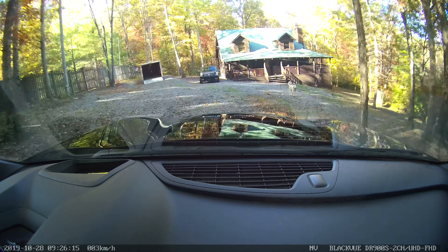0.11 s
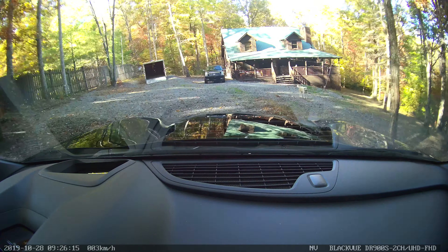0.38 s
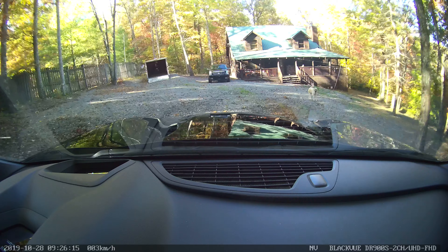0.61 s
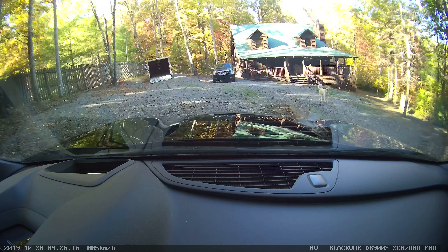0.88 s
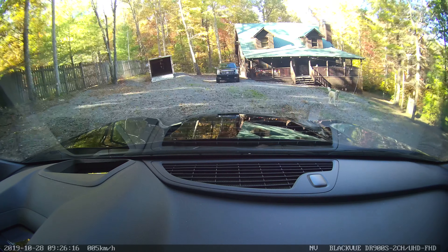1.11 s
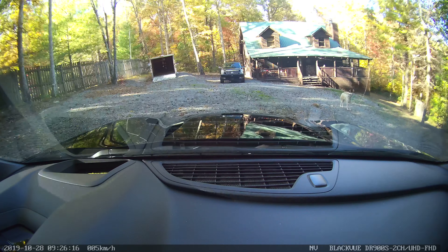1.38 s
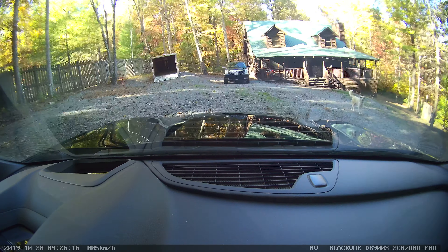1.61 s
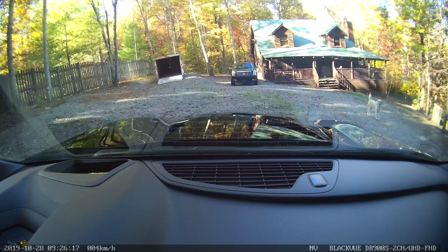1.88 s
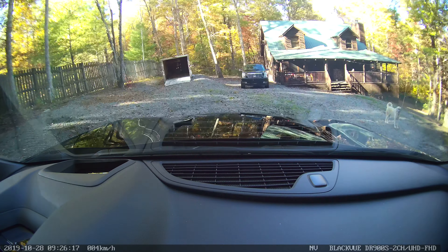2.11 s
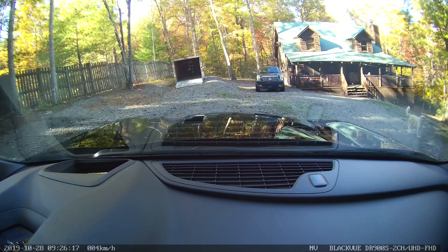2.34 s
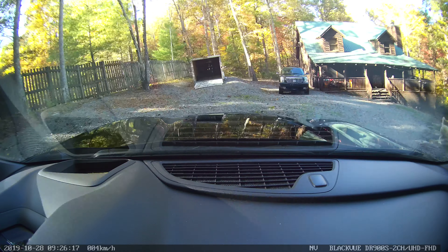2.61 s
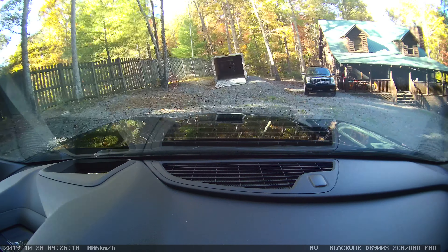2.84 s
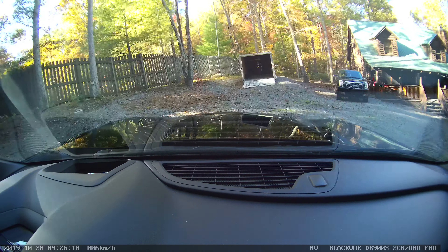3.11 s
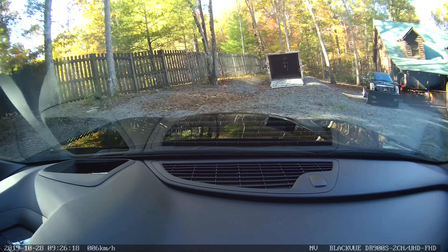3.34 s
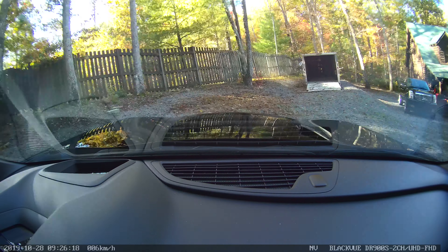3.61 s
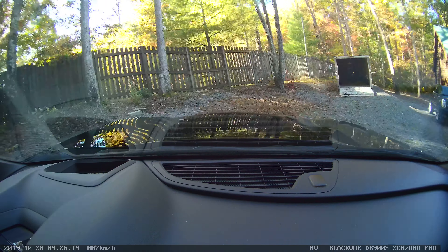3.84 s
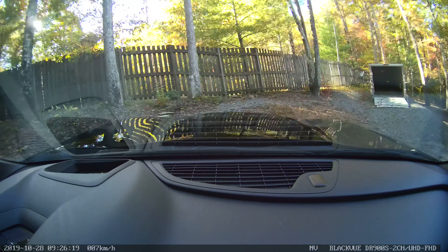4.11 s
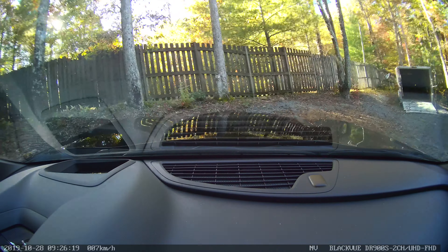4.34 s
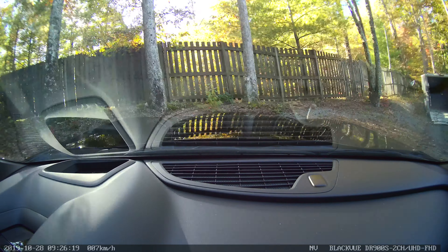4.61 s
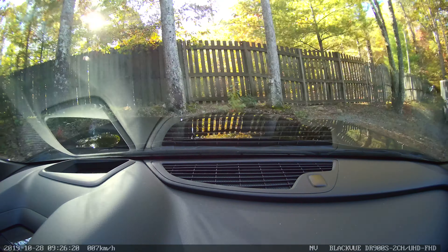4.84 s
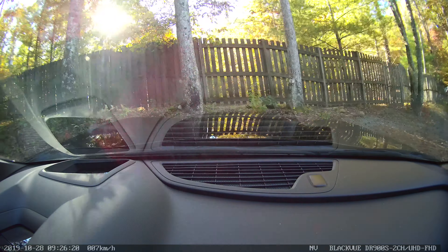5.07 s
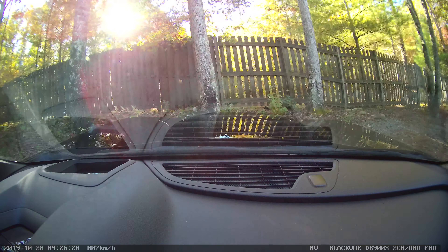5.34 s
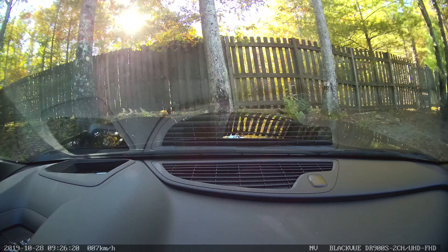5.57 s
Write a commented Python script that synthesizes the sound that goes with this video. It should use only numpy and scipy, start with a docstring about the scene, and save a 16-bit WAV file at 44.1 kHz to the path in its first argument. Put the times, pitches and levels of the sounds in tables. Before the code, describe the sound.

Tyres roll slowly over loose gravel, heard inside the closed cabin. Low body boom swells with each bump over a wavering engine idle. Small muted ticks come first, then the loudest thuds and hard stone hits around 2.8 to 3.7 seconds. Afterwards the crunch thins to soft, low thumps as the shaking fades. The dashboard microphone is close, dull and slightly hissy.

```python
"""The body of a car booms and rumbles as it crawls over gravel and slows down: random jolts of the
wheels shake resonances of cabin, shell and floor. Crushed gravel crunches dully through the floor, larger
stones thud as noise bursts in the same resonances, and thrown stones ring the decaying modes of the metal.
The idling engine hums as wavering sines. A small microphone behind the windscreen adds coloured hiss."""
import sys
import numpy as np
from scipy import signal
from scipy.fft import rfft, irfft, next_fast_len
from scipy.io import wavfile
from scipy.ndimage import uniform_filter1d

SR = 44100
rng = np.random.default_rng(int(sys.argv[2]) if len(sys.argv) > 2 else 0)


def inscribe(sig):
    """Save sig as 16-bit PCM at rate SR to the path in sys.argv[1].

    A 1-D sig is mono; a 2-D sig holds one channel per row.
    Samples are clipped to [-1, 1] before scaling.
    """
    pcm = np.round(np.clip(np.atleast_2d(sig).T, -1, 1) * 32767)
    wavfile.write(sys.argv[1], SR, pcm.astype(np.int16))


def ratio_of_db(decibels):
    """Turn decibels (scalar or array-like) into linear amplitude factors; 0 dB maps to 1."""
    return 10 ** (np.asarray(decibels, float) / 20)


N = 251801

# resonances of the body shell (first two) and floor pan: hz, nominal width_hz, relative level_db per Hz
SHELL_MODES = [(83.1, 30.2, 0), (114.7, 31.3, -0.5), (150.3, 55.8, -6), (209, 59.6, -7.5),
               (298.4, 58, -16.5)]
# resonances of the cabin that colour the crunch: hz, nominal width_hz, relative level_db per Hz
CABIN_MODES = [(368.5, 125, 3), (549.6, 108, 0.5), (758, 209, -1), (1070, 167, -10), (1305, 205, -9),
               (1485, 270, -27.5), (2020, 400, -24), (3020, 520, -32), (5370, 2700, -34.5)]


def rms_one(x):
    """Normalisation: the signal scaled to rms 1."""
    return x / np.sqrt(np.mean(x ** 2) + 1e-20)


def drift(rate_hz):
    """Slow random modulation of rms 1: noise at SR / 40 through a double one-pole low-pass."""
    pole = np.exp(-2 * np.pi * rate_hz / (SR / 40))
    noise = rng.standard_normal(N // 40 + 2002)
    slow = signal.lfilter([1], [1, -2 * pole, pole * pole], noise)[2000:]   # settled part
    return np.interp(np.arange(N) / 40, np.arange(len(slow)), rms_one(slow))


def resonance(x, hz, width_hz):
    """Damped resonance: a two-pole band-pass with gain 1 at its peak."""
    r = np.exp(-np.pi * width_hz / SR)
    poles = [1, -2 * r * np.cos(2 * np.pi * hz / SR), r * r]
    return signal.lfilter([(1 - r * r) / 2, 0, (r * r - 1) / 2], poles, x + 1e-18)


def double_resonance(x, hz, width_hz):
    """Cascaded resonance: two equal peaks in series give steeper skirts."""
    return resonance(resonance(x, hz, width_hz), hz, width_hz)


def grains(per_s, spread_db):
    """Shot noise: random clicks of random sign, mostly small and a few large."""
    heights = ratio_of_db(spread_db * np.minimum(rng.exponential(1, N), 5))
    signs = rng.choice([-1, 1], N)
    return heights * signs * (rng.random(N) < per_s / SR)


def through(modes, shared, own_per_s, own_share, patchy_db, patch_rate_hz):
    """Modal excitation: shared jolts and grains of its own shake each resonance, which flickers a little."""
    out = 0
    for k, (hz, width_hz, level_db) in enumerate(modes):
        own = rms_one(grains(own_per_s, spread_db=2.08))
        shake = rms_one(shared) * (-1) ** k + own_share * own   # neighbours take the jolts in opposite sign
        ring = rms_one(double_resonance(shake, hz, width_hz * 1.41))
        level = ratio_of_db(level_db + patchy_db * drift(patch_rate_hz))
        out = out + level * ring * np.sqrt(width_hz)
    return rms_one(out)


def burst(t, rise_s, length_s):
    """Amplitude envelope on noise: a linear rise under a bell-shaped decay."""
    rise = np.minimum(t / max(rise_s, .001), 1)
    decay = np.exp(-(t / max(rise_s + length_s, .003)) ** 2)
    return rng.standard_normal(len(t)) * rise * decay


def add(out, hit, start_s, level_db):
    """Superposition of a hit; level_db is the peak of a sine as strong as its loudest 9 ms."""
    at = round(start_s * SR)
    loudest = np.sqrt(2 * uniform_filter1d(hit ** 2, size=400).max())
    out[at:at + len(hit)] += ratio_of_db(level_db) * hit / loudest


def evened(x, window_s, depth):
    """Sustained excitation: the wheels keep a vibration going, so chance swells are partly levelled; rms 1."""
    size = np.sqrt(uniform_filter1d(rms_one(x) ** 2, int(window_s * SR)) + 0.12)
    return rms_one(x / size ** depth)


def follows(shaking_db, level_db, db_per_db):
    """Power law of excitation: level_db at 0 dB shaking, changing by db_per_db."""
    return level_db + db_per_db * shaking_db


def hiss():
    """Stationary coloured noise: the microphone's spectrum is imposed on white noise."""
    # spectrum of the microphone hiss: hz, relative level_db per Hz
    hiss_spectrum = [(880, -36), (1500, -8.5), (1760, -5), (1960, -7.5), (2140, -3), (2390, -7.5),
                     (2990, -6.5), (3970, -7.5), (6010, -7.5), (6840, -6), (8510, -29.5), (11100, -64),
                     (18700, -120)]
    size = next_fast_len(N)
    bins_hz = np.maximum(np.arange(size // 2 + 1) * SR / size, 1)
    point_hz, point_db = np.transpose(hiss_spectrum)
    colour = ratio_of_db(np.interp(np.log(bins_hz), np.log(point_hz), point_db))
    noise = irfft(rfft(rng.standard_normal(size)) * colour, size)[:N]
    return ratio_of_db(-67) * rms_one(noise)


def engine():
    """Harmonic source: the idle firing rate and its multiple waver slightly in speed and strength."""
    # firing tones of the engine: mean hz, median rms level_db
    firing_tones = [(43.4, -38.5), (86.8, -51)]
    warped_s = np.cumsum(1 + 0.01133 * drift(1.1)) / SR   # time as the uneven engine speed runs it
    out = 0
    for hz, level_db in firing_tones:
        strength = ratio_of_db(level_db + 1.6 * drift(3.0)) * np.sqrt(2)
        out = out + strength * np.sin(2 * np.pi * hz * warped_s)
    return out


def stones():
    """Impact excitation: a stone rattles briefly on the metal and rings the modes near its centre most."""
    # modes of the metal panels: hz, relative level_db, t60_s
    panel_modes = [(1250, -20, .05), (1351, 12, 0.086), (1468, 7.5, 0.061), (1950, -23, .05),
                   (2313, 1.5, 0.029), (2620, -6, .04), (2970, 13.5, 0.014), (3050, -0.5, 0.032),
                   (3100, -10.5, 0.16), (3290, -4.5, 0.07), (3306, 0, .05), (3860, -11.5, 0.09),
                   (4270, -1, 0.056), (5000, -2, 0.038), (5420, -6.5, .04), (5390, -8.5, 0.046),
                   (5630, -4, 0.06), (5520, -13, .04), (6170, -12, 0.12), (6530, -4, 0.036), (7300, 4, .04)]
    # stones on the panels, a hard hit in a low and a high part:
    # start_s, level_db, centre_hz, spread_octaves, rattle_s (beyond the rise)
    stone_hits = [(0.383, -58, 2480, 0.88, 0.0072), (0.721, -63, 2620, .77, .012),
                  (2.161, -54.5, 2030, .66, 0.0076), (2.418, -58, 2280, 0.68, .004),
                  (2.621, -48.5, 1970, 0.29, 0.0036), (2.657, -48, 3070, .27, 0.017),
                  (2.656, -52.5, 5000, 0.82, 0.02), (2.76, -40.5, 1350, 0.25, 0.047),
                  (2.81, -36, 1390, 0.3, 0.011), (2.848, -32, 5240, 0.22, .009),
                  (2.849, -42, 4670, .52, 0.022), (2.85, -39.5, 2380, 0.13, 0.0037),
                  (2.886, -49.5, 4000, 1.2, .003), (2.922, -34, 3050, 0.18, 0.0087),
                  (2.921, -39.5, 1400, .2, .012), (2.918, -55, 5320, 0.38, 0.013),
                  (3.273, -40.5, 1360, 0.13, 0.064), (3.41, -34.5, 4200, 0.85, 0.028),
                  (3.414, -32.5, 1390, 0.54, 0.035), (3.56, -43, 1390, .19, 0.016),
                  (3.79, -45, 1350, .14, 0.0077), (5.014, -44.5, 1250, 0.15, 0.0054),
                  (5.016, -58.5, 2600, .46, .01)]
    out, t = np.zeros(N + SR), np.arange(SR // 4) / SR
    for start_s, level_db, centre_hz, octaves, rattle_s in stone_hits:
        rise_s = 0.00078 + 0.07 * rattle_s   # a longer rattle swells more slowly
        rattle = burst(t, rise_s, rattle_s)
        rings = 0
        for hz, mode_db, t60_s in panel_modes:
            near = np.exp(-.5 * (np.log2(hz / centre_hz) / octaves) ** 2)
            r, w = ratio_of_db(-60 / (t60_s * SR)), 2 * np.pi * hz / SR   # decay and turn per sample
            ring = signal.lfilter([0, np.sin(w)], [1, -2 * r * np.cos(w), r * r], rattle)
            rings = rings + near * ratio_of_db(mode_db) * ring
        crack = double_resonance(rattle, centre_hz, centre_hz * 0.57 * max(octaves, .05))
        add(out, rms_one(rings) + ratio_of_db(-0.5) * rms_one(crack), start_s, level_db)
    return out[:N]


def thuds():
    """Filtered transient: a larger stone slips under a tyre, a dull burst in the resonances near its centre."""
    # thuds through the floor: start_s, level_db, centre_hz,
    # spread_octaves (before narrowing), length_s (beyond the rise)
    thud_hits = [(0.096, -46, 890, 0.74, 0.016), (.304, -46, 700, 0.36, 0.011),
                 (0.53, -43.5, 795, 0.26, 0.012), (.584, -43, 1000, .49, 0.022),
                 (0.646, -36, 775, 0.31, .025), (.72, -39, 935, 0.62, 0.016), (1.64, -34, 170, 0.25, .05),
                 (1.85, -33, 110, 0.19, .05), (1.94, -30.5, 159, 0.43, .05), (1.978, -37.5, 760, 0.3, 0.03),
                 (2.138, -36.5, 584, .33, 0.013), (2.179, -28, 204, 0.2, 0.044),
                 (2.394, -49, 706, 0.78, .02), (2.758, -24, 280, 1.2, 0.044), (2.81, -22, 208, 0.4, 0.075),
                 (2.887, -27.5, 658, 0.57, 0.029), (2.93, -29.5, 525, 0.62, 0.052),
                 (2.985, -35.5, 191, 0.48, .04), (3.274, -28.5, 278, 0.77, 0.072),
                 (3.36, -29, 110, 0.24, .05), (3.47, -36, 110, 0.34, .04), (3.553, -38, 725, .76, 0.066),
                 (3.652, -26.5, 250, 0.45, 0.02), (3.667, -23.5, 490, 0.49, 0.031),
                 (3.703, -26, 535, 0.34, 0.016), (3.91, -33, 183, 0.23, .05), (4.04, -27, 166, 0.37, 0.028),
                 (4.551, -31, 110, 0.31, 0.044), (4.611, -31, 141, 0.44, .055),
                 (4.814, -52, 715, 0.31, 0.014), (5.013, -43.5, 900, 0.99, 0.012),
                 (5.22, -26.5, 164, 0.44, .045), (5.655, -33, 139, 0.77, 0.034)]
    out, t = np.zeros(N + SR), np.arange(SR // 3) / SR
    for start_s, level_db, centre_hz, octaves, length_s in thud_hits:
        rise_s = .002 + 1.3 / centre_hz   # a lower thud swells more slowly
        hit = 0
        for hz, width_hz, _ in SHELL_MODES + CABIN_MODES:
            near = np.exp(-.5 * (np.log2(hz / centre_hz) / (0.82 * octaves)) ** 2)
            ring = double_resonance(burst(t, rise_s, length_s), hz, 1.27 * width_hz)
            hit = hit + near * rms_one(ring)
        add(out, hit, start_s, level_db)
    return out[:N]


def crunch(shaking_db, jolts):
    """Granular excitation: crushed gravel, as dense grains and shared jolts, shakes the cabin resonances."""
    sound = through(CABIN_MODES, jolts, own_per_s=1200., own_share=2.33, patchy_db=0.9, patch_rate_hz=8.8)
    return ratio_of_db(follows(shaking_db, level_db=-44, db_per_db=0.59)) * sound


def drumming(shaking_db, jolts):
    """Plate resonance: jolts and grains drum on the floor pan."""
    sound = through(SHELL_MODES[2:], jolts, own_per_s=400., own_share=1.62, patchy_db=2.5, patch_rate_hz=8.0)
    level = ratio_of_db(follows(shaking_db, level_db=-34.5, db_per_db=0.86))
    return level * evened(sound, window_s=0.082, depth=0.44)


def rumble(shaking_db, jolts):
    """Structural resonance: jolts and grains shake the two lowest modes of the body shell."""
    sound = through(SHELL_MODES[:2], jolts, own_per_s=300., own_share=1.31, patchy_db=1.0, patch_rate_hz=9.7)
    level = ratio_of_db(follows(shaking_db, level_db=-31.5, db_per_db=1.11))
    return level * evened(sound, window_s=0.065, depth=0.49)


def heaving(shaking_db):
    """Addition of powers: a steady part plus a bell-shaped swell for each bump gives the boom's level in dB."""
    # the body heaves on its springs over bumps: middle_s, level_db, length_s (between 1/e points of power)
    heaves = [(0.034, -20.5, 0.033), (0.213, -23, 0.15), (0.456, -25.5, 0.14), (0.73, -22.5, 0.13),
              (1.035, -24.5, 0.21), (1.299, -20, 0.11), (1.639, -22, 0.043), (1.905, -25, 0.11),
              (2.164, -23, 0.17), (2.515, -23.5, 0.25), (2.64, -16, 0.062), (2.857, -20.5, 0.19),
              (3.207, -27.5, 0.21), (3.364, -29.5, 0.048), (3.683, -29.5, 0.19), (3.962, -29, 0.18)]
    t = np.arange(N) / SR
    power = ratio_of_db(2 * follows(shaking_db, level_db=-33, db_per_db=.7))
    for middle_s, level_db, length_s in heaves:
        power = power + ratio_of_db(2 * level_db) * np.exp(-(2 * (t - middle_s) / length_s) ** 2)
    return 10 * np.log10(power)


def boom(level_db):
    """Cavity resonance: noise shakes the cabin's lowest resonances."""
    # resonances of cabin air and springs: hz, nominal width_hz, relative rms level_db
    boom_modes = [(30.65, 12.5, 4), (38.85, 13, -2.5), (45.4, 13, -6)]
    out = 0
    for hz, width_hz, mode_db in boom_modes:
        shake = rng.standard_normal(N + SR)
        out = out + ratio_of_db(mode_db) * rms_one(double_resonance(shake, hz, 1.33 * width_hz))
    settled = out[SR:]
    return ratio_of_db(level_db) * evened(settled, window_s=0.041, depth=0.59)


def scene():
    """Superposition: all sources are summed at one microphone."""
    # how hard the gravel shakes the car, fading as it slows: time_s, shaking_db
    shaking = [(0, 1), (.5, -0.5), (.62, -2), (.78, -1), (1.38, -1), (1.5, -4.5), (1.66, -1.5), (1.92, 1.5),
               (2.45, -2.5), (2.7, 2), (2.88, 8), (3.12, 0), (3.4, 3.5), (3.6, 1.5), (3.9, 0), (4.33, -6),
               (4.62, -1.5), (4.85, -6.5), (5.25, -6.5), (5.55, -11), (5.71, -5.5)]
    time_s, points_db = np.transpose(shaking)
    shaking_db = np.interp(np.arange(N) / SR, time_s, points_db)
    jolts = grains(220 * ratio_of_db(4.5 * drift(14.0)), spread_db=2.7)   # stones give way in clumps
    background = engine() + stones() + thuds()
    gravel = crunch(shaking_db, jolts) + drumming(shaking_db, jolts) + rumble(shaking_db, jolts)
    mix = background + gravel + boom(heaving(shaking_db))
    return mix[None]   # one channel


def band_limit(x):
    """A steep low-pass at the top of the band."""
    return signal.sosfilt(signal.butter(12, 8660, fs=SR, output="sos"), x)


def record(dry):
    """Band limitation: a steep low-pass at 6800 Hz dulls the scene, then the microphone hiss is added."""
    low_pass = signal.butter(8, 6800, fs=SR, output="sos")
    dull = signal.sosfilt(low_pass, dry)
    return band_limit(dull + hiss())


dry = scene()
out = record(dry)
inscribe(out)
```